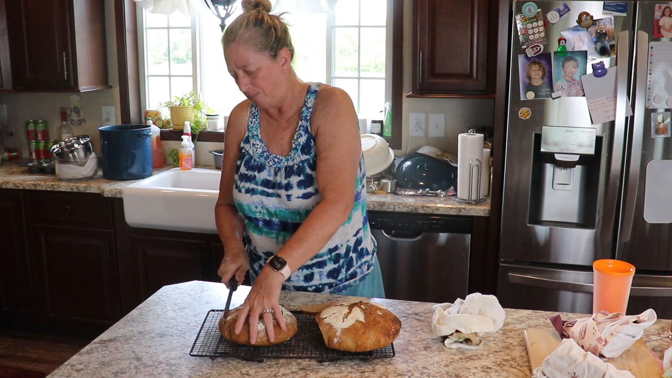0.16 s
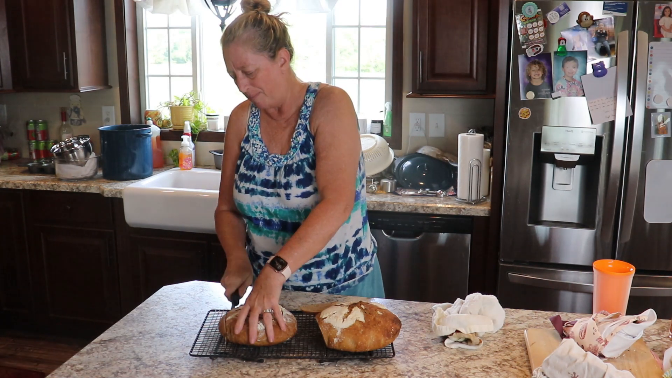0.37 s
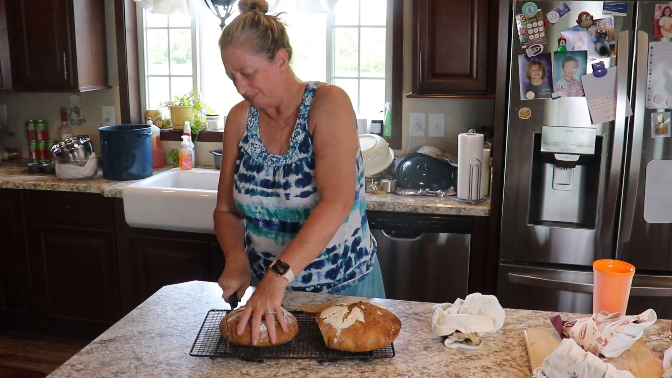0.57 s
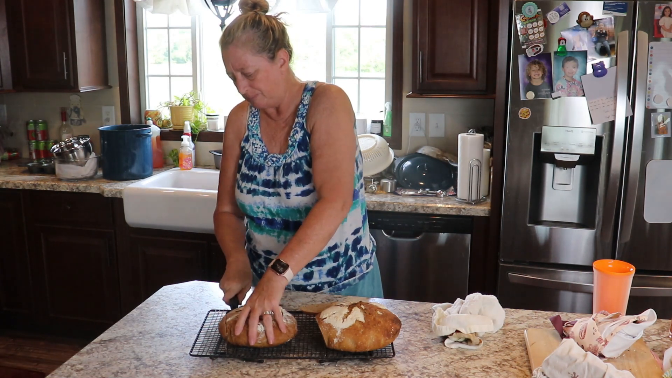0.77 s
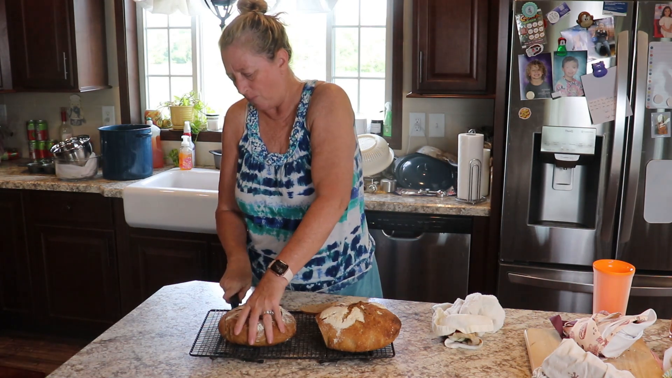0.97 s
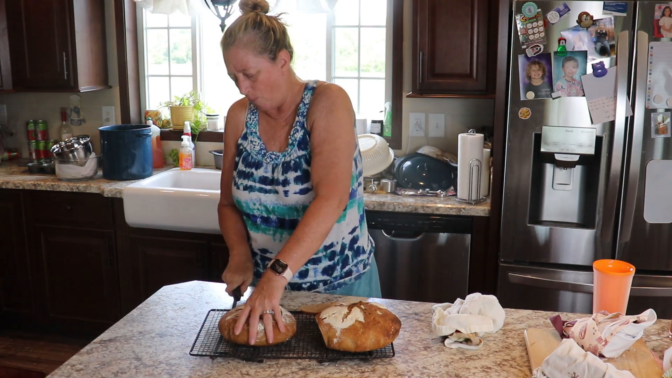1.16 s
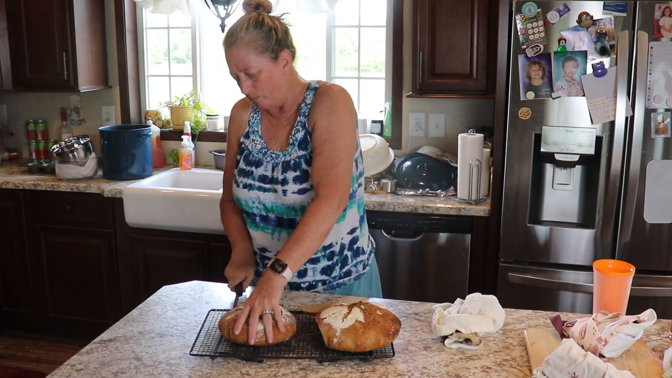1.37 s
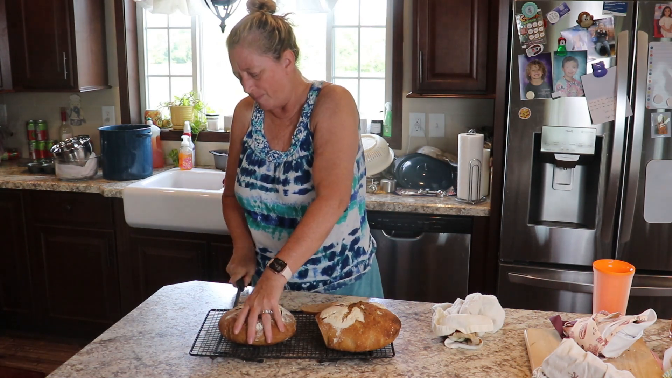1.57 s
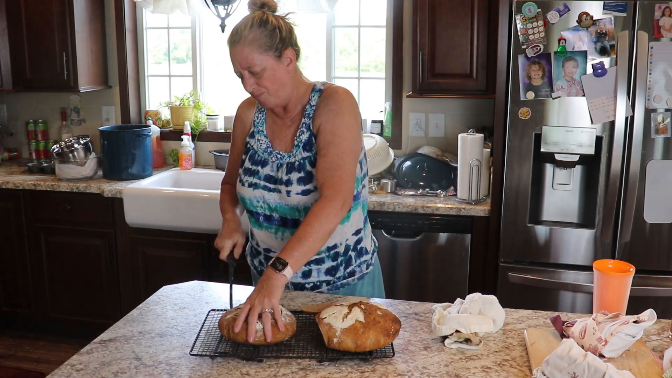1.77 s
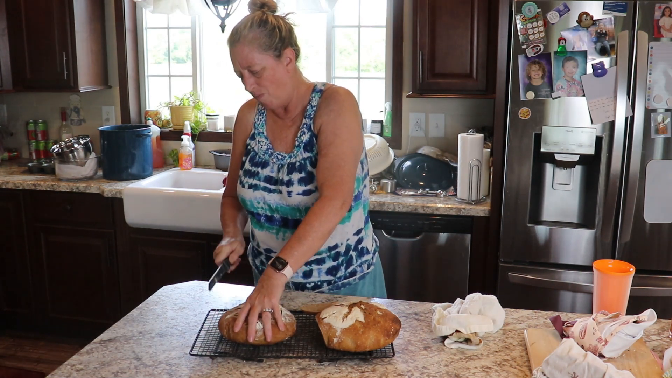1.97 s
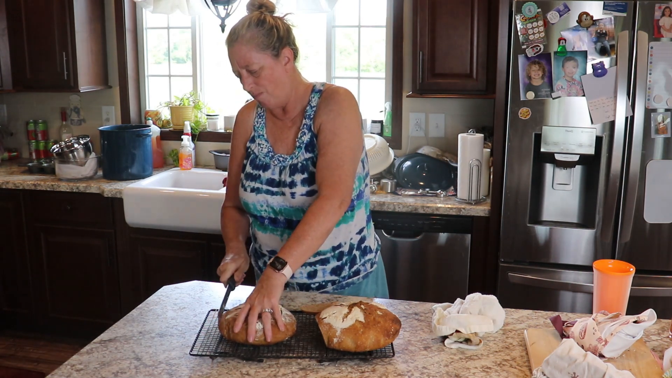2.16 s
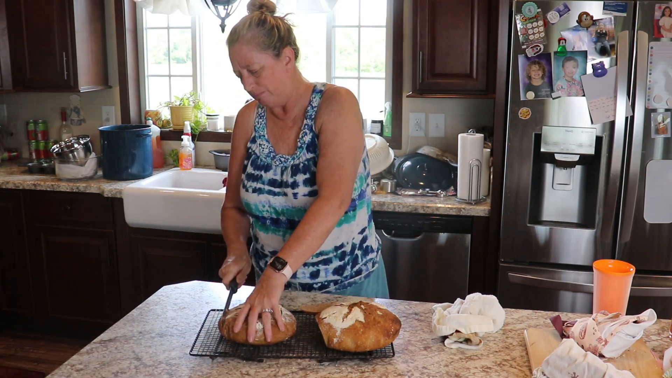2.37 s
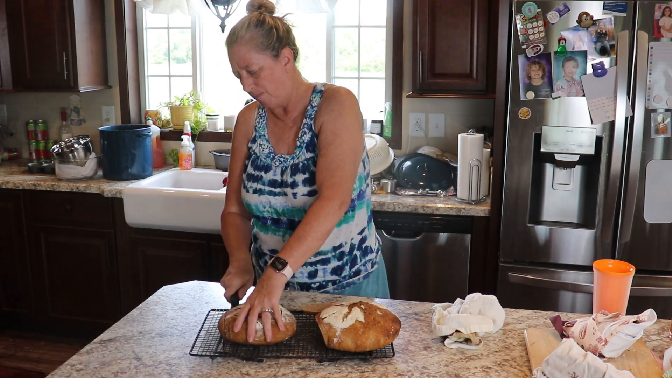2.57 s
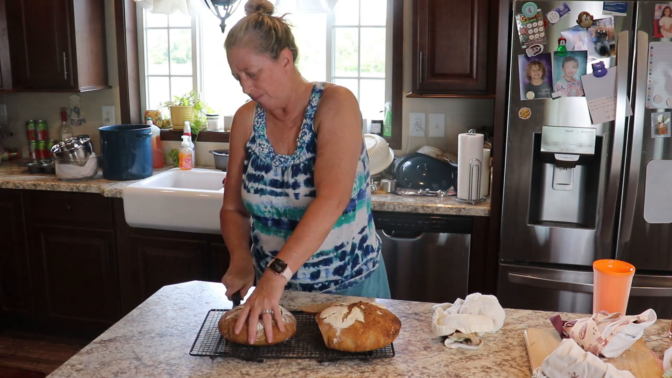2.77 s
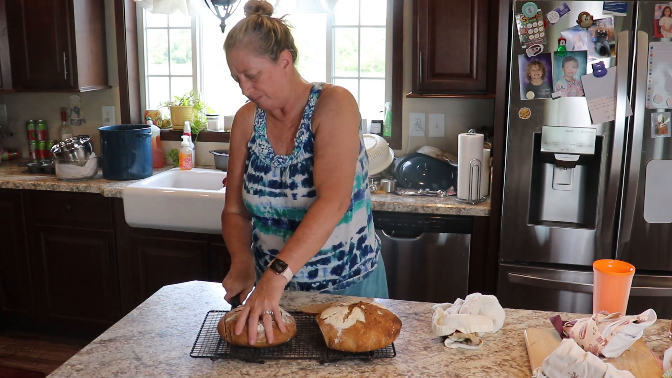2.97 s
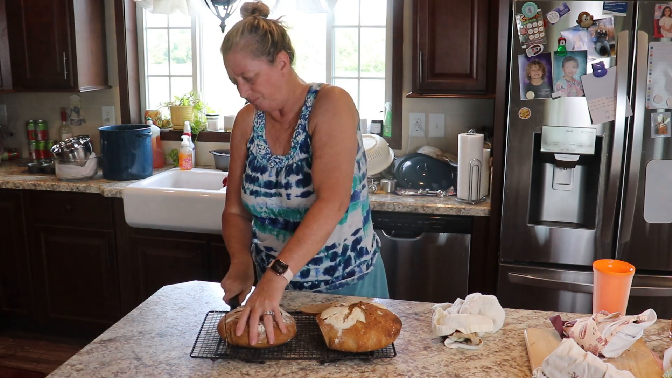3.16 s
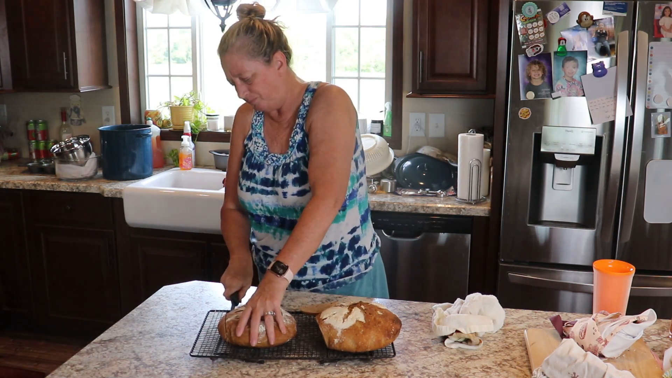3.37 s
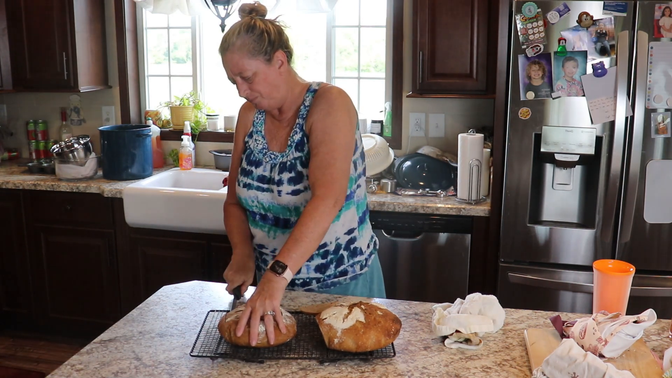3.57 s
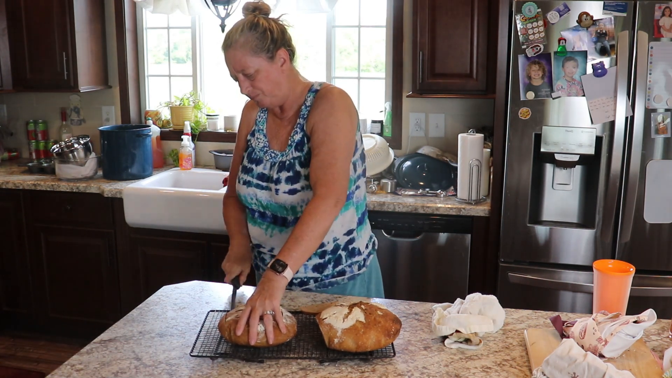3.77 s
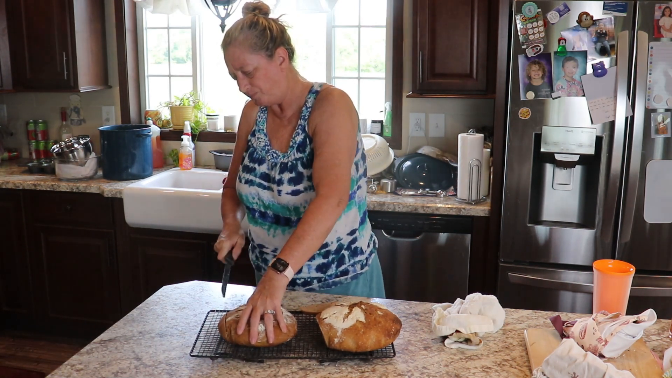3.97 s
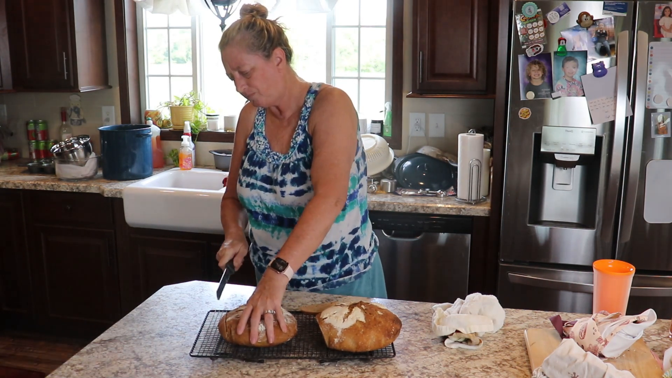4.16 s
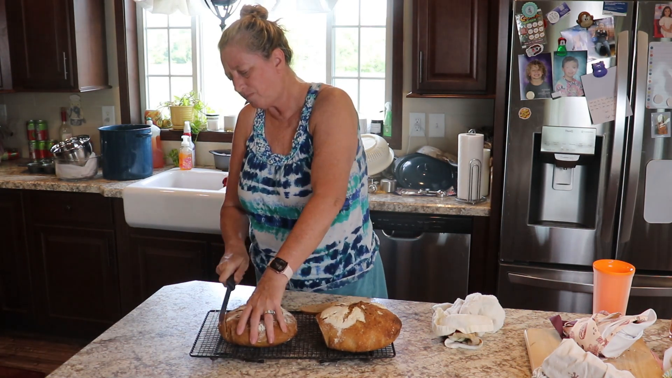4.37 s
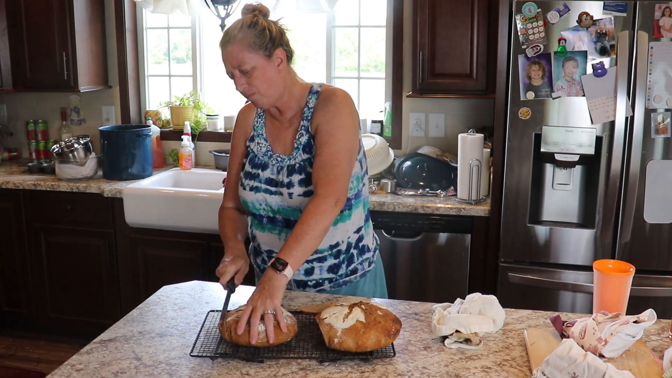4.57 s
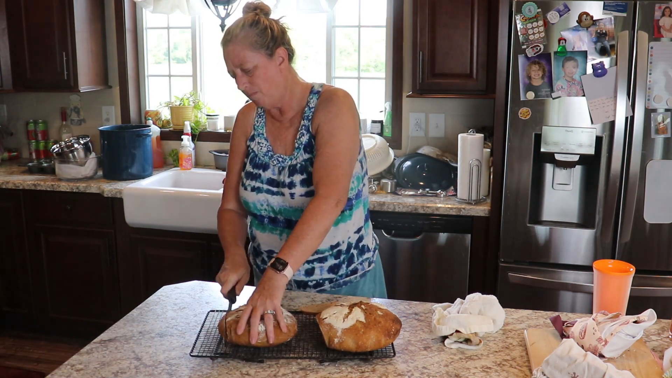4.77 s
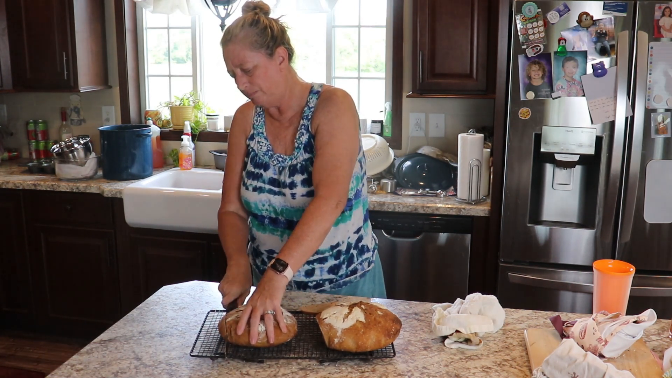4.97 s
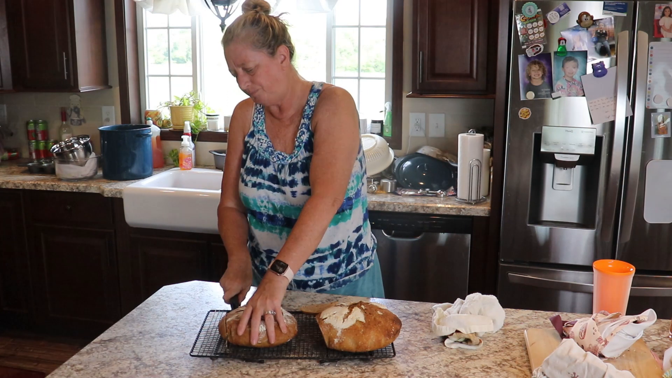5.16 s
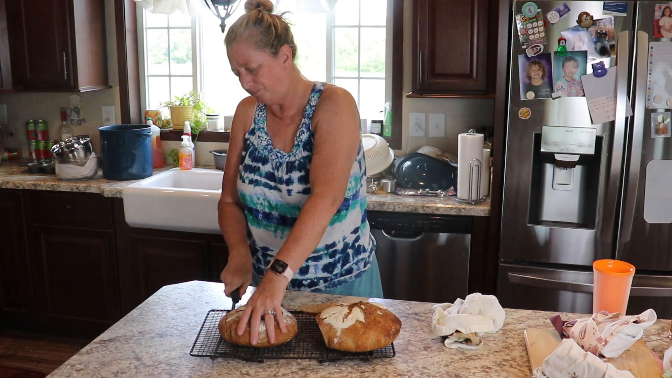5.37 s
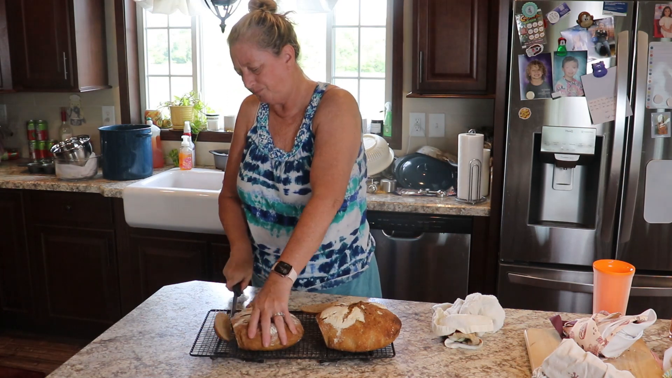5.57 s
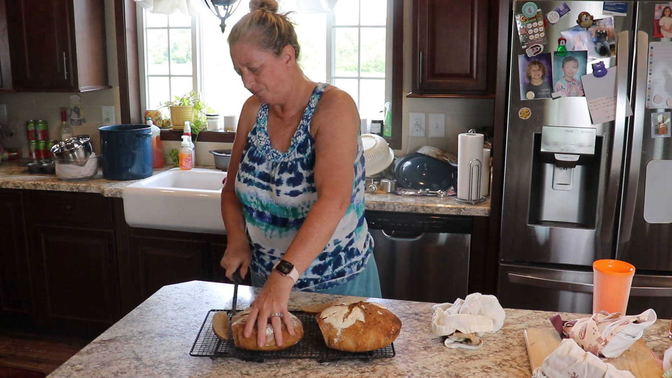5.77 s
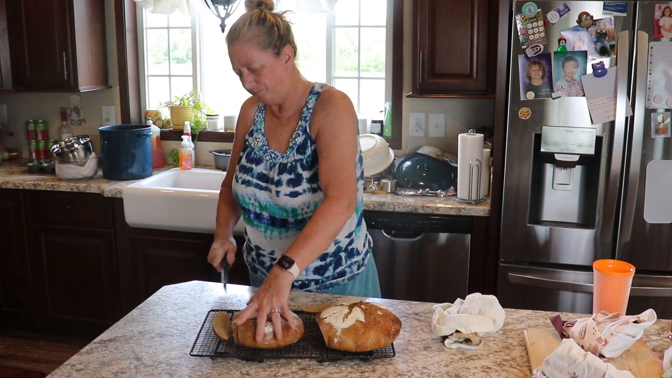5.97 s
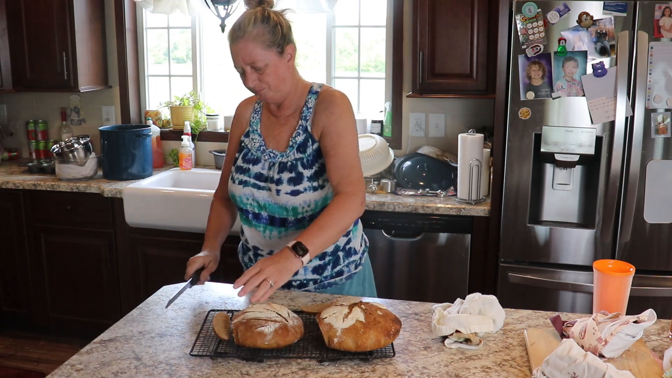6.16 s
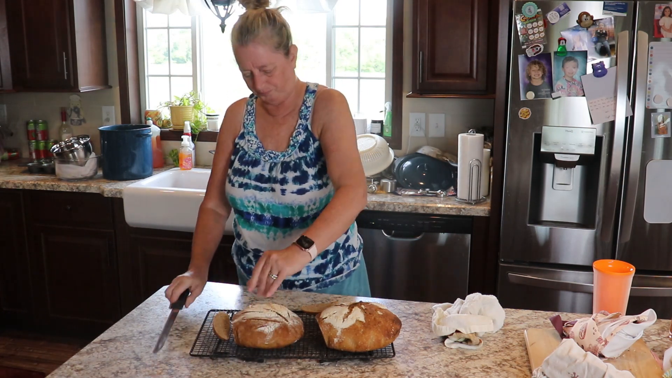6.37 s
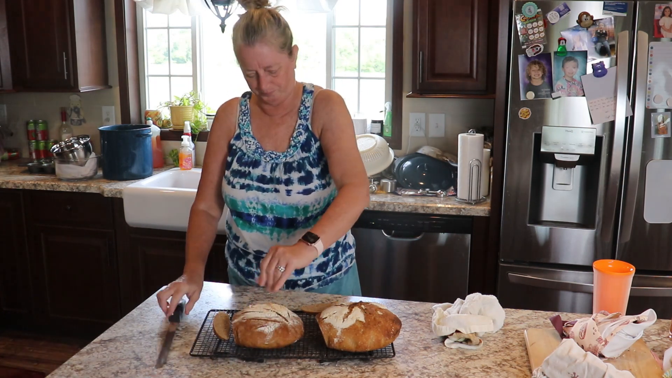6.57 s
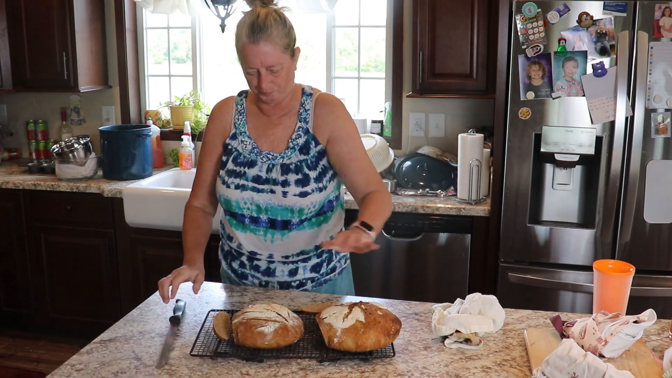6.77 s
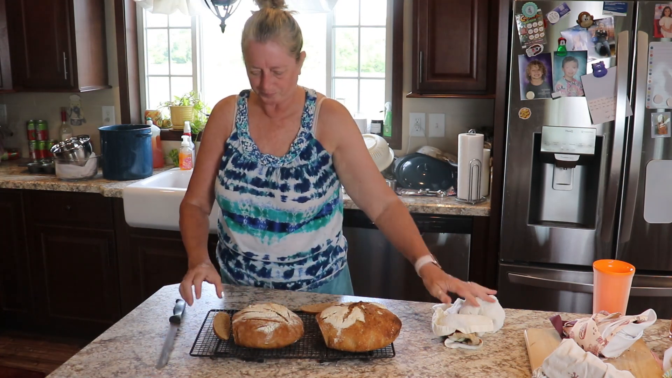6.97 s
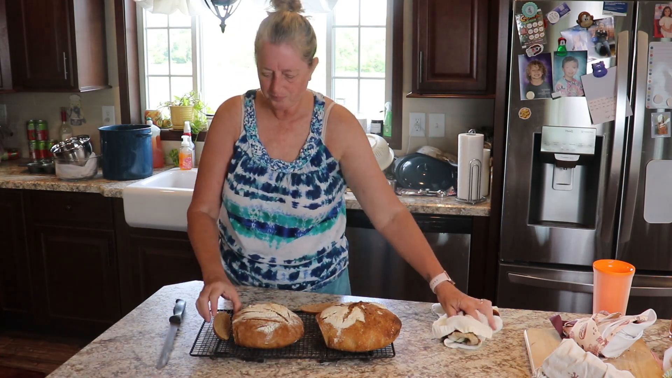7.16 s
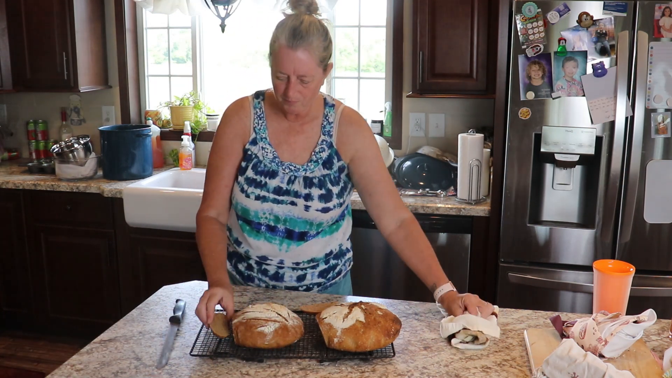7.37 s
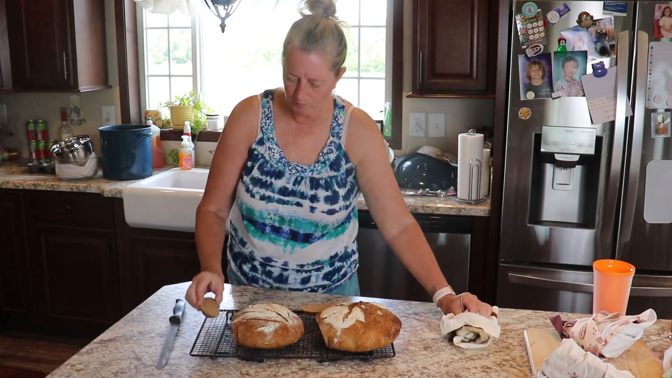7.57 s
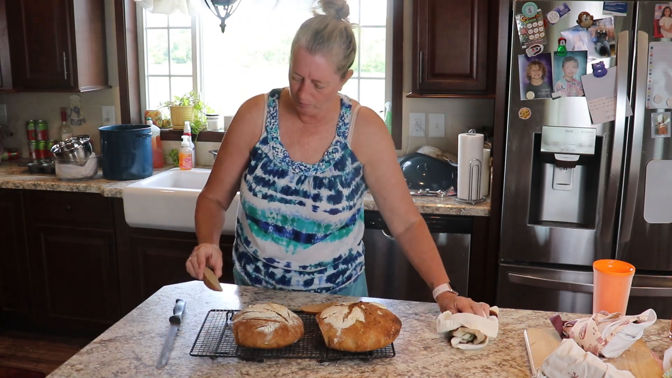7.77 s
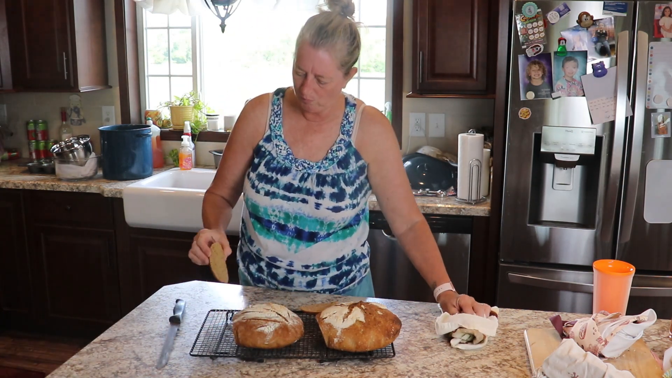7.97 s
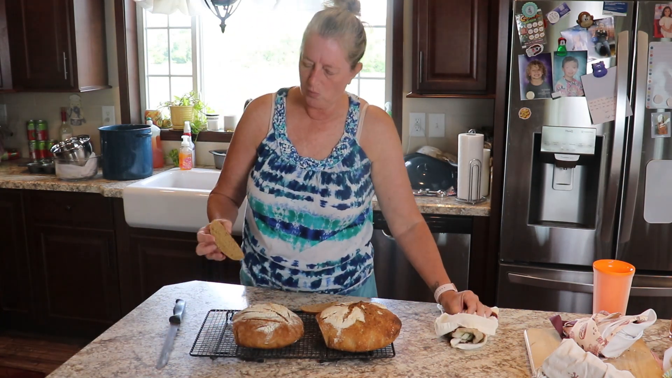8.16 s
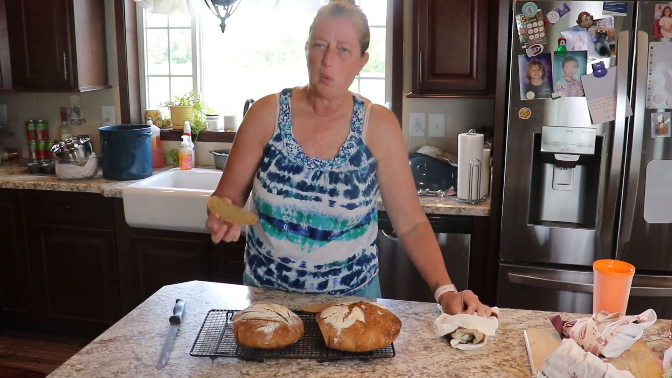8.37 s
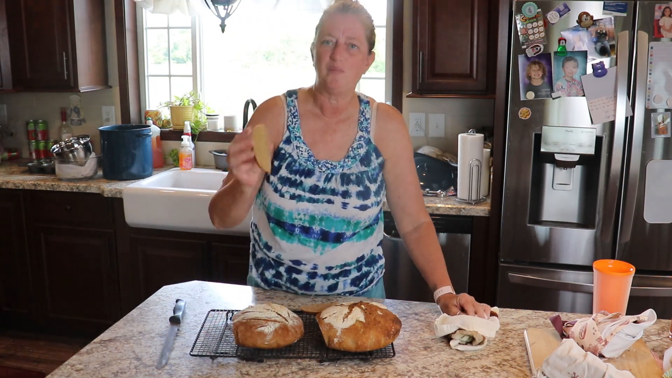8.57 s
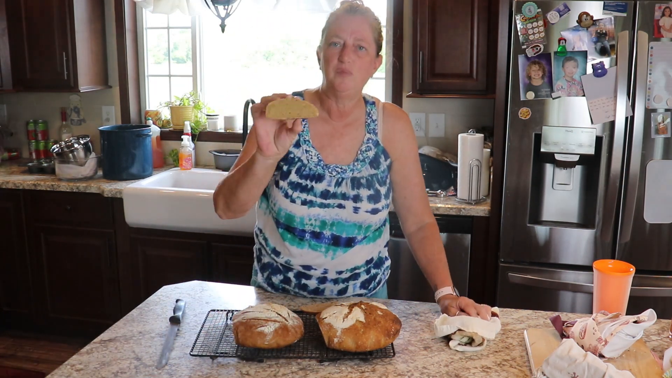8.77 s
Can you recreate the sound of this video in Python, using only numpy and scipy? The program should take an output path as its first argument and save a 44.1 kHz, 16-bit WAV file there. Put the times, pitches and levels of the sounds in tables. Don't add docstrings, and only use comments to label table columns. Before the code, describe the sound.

Crackling bread crust under short sawing strokes, a faint blade ring, then hard metallic knocks and a brief scrape as the knife is laid down.

```python
import sys
import numpy as np
from scipy import signal
from scipy.fft import rfft, irfft, next_fast_len
from scipy.io import wavfile
from scipy.ndimage import uniform_filter1d

SR = 44100
rng = np.random.default_rng(int(sys.argv[2]) if len(sys.argv) > 2 else 0)


def decibels_to_gain(level_db):
    exponent = np.asarray(level_db, float) / 20
    return 10 ** exponent


def generate_wav(signal):
    frames = np.transpose(np.atleast_2d(signal))
    scaled = np.clip(frames, -1, 1) * 32767
    pcm = np.round(scaled).astype(np.int16)
    wavfile.write(sys.argv[1], SR, pcm)


N = 389403

# frequency_hz, density_db (per Hz)
HISS_SPECTRUM = [(15, -41), (25, -11), (43, -1.5), (76, -5.5), (108, 1), (145, -12.5), (175, -8),
                 (416, -11.5), (560, -14), (886, -15.5), (1560, -18), (2160, -18.5), (5000, -21.5),
                 (16000, -32)]
# frequency_hz, coherence (0 to 1)
HISS_COHERENCE = [(60, 0.93), (180, 0.73), (550, 0.42), (1650, 0.17), (4970, 0.05), (15000, 0.13)]
# frequency_hz, t60_s
ROOM_DECAY = [(200, .5), (600, .6), (1400, .6), (3700, .48), (9700, .35)]
# frequency_hz, phase_rad
PORT_PHASE = [(0, -1), (690, 0.13), (1810, 0.62), (2670, 0.15), (3450, 1.0), (3790, 0.75), (5000, 1.5),
              (6630, 1.54), (7410, 1.5), (8700, 1.55), (12600, 3.5), (14400, 4.5), (15100, -1), (15700, 20)]
# frequency_hz, level_db
PORT_LEVEL = [(60, -1.5), (180, 0.0), (550, 0.0), (1650, -1.0), (4970, -1.5), (15000, 0.5)]
# start_s, peak_db, pitch_hz, t60_s
COUNTER_THUMPS = [
    (0.719, -33, 61.9, 0.3),
    (0.999, -34, 59.2, 0.3),
    (1.079, -36, 43.1, 0.3),
    (3.692, -32.5, 67.3, 0.3),
    (5.27, -23, 59.2, 0.3),
    (5.627, -28, 61.9, 0.3),
    (5.749, -38, 83.4, 0.3),
]
# start_s, peak_db, pitch_hz, treble_db, length_s
KNIFE_KNOCKS = [
    (6.574, 3.5, 3260, -11, 0.015),
    (6.582, -5, 3420, -19, 0.015),
    (6.654, 6, 2130, -24, 0.015),
    (6.671, -15, 1410, -17, 0.015),
    (6.691, -10, 576, -11, 0.015),
    (6.719, -3, 1950, -15, 0.015),
    (6.754, -10, 929, -13, 0.015),
    (6.935, -7.5, 764, -13, 0.015),
    (8.719, -21, 490, -12, 0.015),
]
# time_s, pressure_db, crispness_db
SLIDE_STROKE = [(6.575, -21, 7.5), (6.647, -27.5, -11.5), (6.655, -5, -20), (6.663, -20, -19),
                (6.713, -28.5, 9.5), (6.723, -15, -14), (6.771, -21, 3), (6.845, -22, -10),
                (6.929, -34, 1.5), (6.939, -27, 2.5), (7.137, -60, -15), (7.15, -35, -14)]
# frequency_hz, density_db (per Hz)
STONE_SPECTRUM = [(88, -77), (150, -43), (254, -5), (341, -16), (524, -1), (1020, -4.5), (1100, -5),
                  (4950, -15), (7600, -12.5), (16000, -16)]
# frequency_hz, width_hz, level_db
STEEL_MODES = [(1030, 50, -5.5), (1960, 29, -1), (3070, 220, -25), (3890, 41, -11), (5270, 47, 4.5),
               (6220, 110, -3), (7390, 44, -10), (8470, 79, -24), (9600, 75, -8), (10800, 71, 3.5)]
# time_s, level_db
BLADE_STROKES = [
    [(1.7, -62), (1.784, -61), (1.846, -41), (1.876, -59), (1.906, -52), (1.944, -66), (2.0, -59)],
    [(2.33, -62), (2.354, -73), (2.384, -54), (2.502, -69), (2.58, -53), (2.618, -53), (2.676, -47),
     (2.77, -68), (2.78, -54)],
    [(4.46, -72), (4.49, -52), (4.604, -50), (4.616, -42), (4.7, -46), (4.736, -29.5), (4.786, -55),
     (4.908, -59), (4.92, -57)],
]
# frequency_hz, width_hz, level_db
BLADE_MODES = [(2750, 94, -3), (4360, 33, -5), (4680, 55, -11), (5240, 70, -11), (5610, 20, -15),
               (7380, 110, -16), (8450, 52, -18)]
# start_s, peak_db, pitch_hz, treble_db, length_s
CRUST_SNAPS = [(0.549, -21.5, 1600, -24, 0.03), (0.656, -13.5, 3170, -24, 0.03),
               (0.683, -11.5, 1560, -23, 0.03), (0.879, 0, 2070, -23, 0.03), (0.897, 5, 1340, -21, 0.03),
               (1.045, -8, 2630, -15, 0.03), (1.051, 0.5, 1580, -26, 0.03), (1.074, -6, 703, -24, 0.03),
               (2.79, -23, 861, -28, 0.03), (2.827, -9, 1610, -21, 0.03), (3.321, -29, 1620, -25, 0.03),
               (3.459, -14.5, 840, -19, 0.03), (3.675, -8, 2340, -20, 0.03), (3.839, -2.5, 2260, -22, 0.03),
               (3.852, -1, 2130, -24, 0.03), (3.865, -5, 1520, -26, 0.03), (3.899, -6.5, 703, -25, 0.03),
               (4.956, 0.5, 2290, -13.5, 0.03), (5.15, -9, 867, -32, 0.03), (5.215, -2, 2300, -21, 0.03),
               (5.231, -2, 991, -29, 0.03), (5.309, -9.5, 775, -24, 0.03), (5.352, -12, 2280, -23, 0.03),
               (5.425, -9.5, 2230, -20, 0.03), (5.612, -0.5, 864, -19.5, 0.03), (5.639, -7, 840, -22, 0.03),
               (7.306, -32, 1240, -15, 0.03), (7.402, -22.5, 864, -22, 0.03),
               (8.304, -18.5, 3050, -2.5, 0.03), (8.324, -16.5, 3070, -15, 0.03)]
# time_s, pressure_db, crispness_db, boom_db
SAW_STROKES = [
    [(0.0, -70, 3, 11), (0.014, -32.5, -5.5, -14), (0.046, -33, -8, -11), (0.054, -36, -6, -8),
     (0.156, -49.5, -8, -18), (0.196, -46, -2, -1), (0.25, -52, -7, -1)],
    [(0.4, -50, 2, 2.5), (0.566, -27, -8.5, -8), (0.618, -39, -15, -5), (0.684, -27.5, -4, -3),
     (0.792, -37, -14, -6), (0.852, -32, 3.5, -4), (0.87, -36, -8, -1), (0.882, -11.5, 2, -9),
     (0.89, -16.5, -15, -1), (0.902, -12.5, 6.5, -13), (0.91, -23, -4, -4), (1.026, -25.5, -3, -10.5),
     (1.034, -37, 0, -2), (1.05, -10.5, 4, -12), (1.086, -19, -19, -8), (1.112, -20.5, -10, -14),
     (1.206, -32, -10, -1.5), (1.41, -44, -12, 1.5), (1.624, -34, -0.5, -6), (1.8, -51.5, -11, -3)],
    [(2.45, -55, -5, -9), (2.48, -66, -9, 1), (2.564, -44, -7, -5), (2.714, -45, -6, -11),
     (2.764, -52, -21, 13), (2.8, -31.5, -2, -12), (2.83, -18.5, -8, -11.5), (2.95, -39, -6, -0.5),
     (3.016, -33, -0.5, -8.5), (3.306, -59, -14, 5), (3.326, -33, -22, -1.5), (3.412, -45, -1, -5),
     (3.482, -21.5, -10, -4.5), (3.658, -31, -4.5, -3), (3.682, -21, -8, -7.5), (3.712, -21.5, -8.5, -3.5),
     (3.808, -23, 2, -12), (3.828, -21.5, -3, -4), (3.842, -11.5, -15, -10.5), (3.868, -8.5, 0.5, -11),
     (3.888, -20.5, -14, -3.5), (4.074, -48, -17, -14), (4.158, -49, -27, 2), (4.228, -61, -6, 2),
     (4.25, -53, -14, -4)],
    [(4.45, -65, -10, 8), (4.5, -40.5, -10, -6), (4.538, -51, 3, -5), (4.552, -44, -2, -18),
     (4.634, -52, -4, 6), (4.652, -43, -9, -22), (4.726, -36, -4, -15), (4.922, -63, -1, -4),
     (4.93, -48, -2, -8)],
    [(4.96, -18.5, 20, -17), (4.97, -24, 3.5, -4.5), (5.09, -45, -4, -15), (5.138, -39, 4, -6),
     (5.152, -19.5, -21, -12), (5.184, -23, -14, -17), (5.2, -31.5, -7, -3), (5.218, -9.5, -1, -10),
     (5.252, -16.5, -19, -6), (5.398, -31.5, -3, -7), (5.522, -26, -9, -8.5), (5.57, -34, 3.5, -9),
     (5.618, -14, -5, -14), (5.654, -17, -6.5, -16), (5.716, -14, 1, -11.5), (5.902, -33, -9, -6.5),
     (6.196, -54, -5, 0), (6.2, -61, 1, 11)],
    [(7.25, -65, -5, 7), (7.296, -65, -6, -4), (7.308, -37.5, -20, -11), (7.366, -52, -10, -8),
     (7.374, -61, -4, 14), (7.404, -32.5, -13, 1), (7.458, -43.5, -26, 1), (7.692, -62, -14, -3),
     (7.7, -59, -6, 1)],
]
# frequency_hz, density_db (per Hz)
CRUST_SPECTRUM = [(59, -38), (100, -11.5), (244, -0.5), (415, -8.5), (661, -1), (1420, -5), (2270, -6),
                  (2680, -12), (3930, -11.5), (4760, -14.5), (10700, -20.5), (16000, -37)]
# frequency_hz, width_hz, level_db
LOAF_MODES = [(270, 70, -7), (545, 50, -2), (680, 60, -4.5), (850, 60, -4.5), (1330, 90, -7),
              (1570, 90, -7.5), (2230, 140, -13), (3880, 200, -13.5)]


def evened(x):
    return x / np.sqrt(np.mean(x ** 2) + 1e-20)


def read(points, hz):
    f, value = np.transpose(points)
    return np.interp(np.log(hz + 1), np.log(f + 1), value)


def add(mix, start_s, sound):
    part = mix[round(start_s * SR):][:len(sound)]
    part += sound[:len(part)]


def stroke_curves(tables):
    t = np.arange(N) / SR
    time_s, *values = np.vstack(tables).T
    gate = sum((t >= rows[0][0]) & (t <= rows[-1][0]) for rows in tables)
    curves = [np.interp(t, time_s, v) for v in values]
    return uniform_filter1d(gate * 1., 300), curves


def band(x, lo_hz, hi_hz):
    edges_hz = [lo_hz, min(hi_hz, SR / 2.2)]
    sos = signal.butter(3, edges_hz, "band", fs=SR, output="sos")
    return evened(signal.sosfilt(sos, x))


def modal_sum(x, modes):
    total = 0
    for hz, width_hz, level_db in modes:
        b, a = signal.iirpeak(hz, hz / max(width_hz, 5), SR)
        total = total + decibels_to_gain(level_db) * signal.lfilter(b, a, x)
    return total


def body(x, spectrum, modes, ring):
    hz = abs(np.fft.fftfreq(4096, 1 / SR))
    log_gain = np.log(decibels_to_gain(np.maximum(read(spectrum, hz), -90)))
    taps = np.fft.ifft(np.exp(np.conj(signal.hilbert(log_gain)))).real[:2048]
    x = signal.oaconvolve(x, taps)[:N]
    return x + ring * modal_sum(x, modes)


def crackle(per_s, spread_db, clump_db):
    size = decibels_to_gain(spread_db * np.minimum(rng.exponential(1, N), 5)) * rng.standard_normal(N)
    clumps = evened(uniform_filter1d(uniform_filter1d(rng.standard_normal(N), 260), 260))
    return size * (rng.random(N) < per_s / SR) * decibels_to_gain(clump_db * clumps)


def impacts(events, ring):
    out, t = np.zeros(N), np.arange(5000) / SR
    noise = rng.standard_normal((len(events), len(t)))
    for (start_s, peak_db, hz, treble_db, length_s), burst in zip(events, noise):
        treble = decibels_to_gain(treble_db + 10.5) * band(burst, 4500, 15000)
        crack = band(burst, 350, 4500) + treble
        knock = np.sin(2 * np.pi * hz * t) * 1.4
        decay = decibels_to_gain(-60 * t / np.clip(length_s, .004, .12))
        attack = 1 - np.exp(-t / .0006)
        sound = decay * attack * ((1 - ring) * crack + ring * knock)
        add(out, start_s, decibels_to_gain(peak_db - 0.5) * sound)
    return out


def with_coherence(first, other, same):
    return same * first + np.sqrt(1 - same ** 2) * other


def room_hiss():
    frames, hz = N // 256 + 5, np.fft.rfftfreq(1024, 1 / SR)
    a, b, c, d, patches = rng.standard_normal((frames, 513, 5)).T
    patches = evened(uniform_filter1d(uniform_filter1d(patches, 10, 0), 14, 1))
    same = np.clip(read(HISS_COHERENCE, hz), -1, 1)[:, None]
    left = a + 1j * b
    z = np.array([left, with_coherence(left, c + 1j * d, same)])
    z *= decibels_to_gain(read(HISS_SPECTRUM, hz)[:, None] + .8 * patches)
    noise = signal.istft(z, nperseg=1024, noverlap=768)[1][:, :N]
    return decibels_to_gain(-39) * evened(noise)


def kitchen(x):
    taps = np.zeros((2, SR))
    at = np.arange(200, SR - 20, 20) + rng.integers(0, 20, (2, (SR - 201) // 20))
    np.put_along_axis(taps, at, rng.choice([-1., 1.], at.shape), 1)
    hz, t, z = signal.stft(taps, SR, nperseg=256)
    same = np.clip(1 / (1 + (hz / 700) ** 2), 0, 1)[:, None]
    z[1] = with_coherence(z[0], z[1], same)
    decay = decibels_to_gain(-60 * t / read(ROOM_DECAY, hz)[:, None])
    tail = signal.istft(z * decay, SR, nperseg=256)[1]
    return signal.fftconvolve(x[None], tail / np.linalg.norm(tail[0]), axes=1)[:, :N]


def microphone_ports(x):
    size = next_fast_len(N)
    hz = np.fft.rfftfreq(size, 1 / SR)
    half = np.exp(.5j * read(PORT_PHASE, hz)) * decibels_to_gain(read(PORT_LEVEL, hz) / 2)
    return irfft(rfft(x, size) * np.array([half, 1 / half]), size)[:, :N]


def counter_thumps():
    out, t = np.zeros(N), np.arange(SR // 2) / SR
    for start_s, peak_db, hz, t60_s in COUNTER_THUMPS:
        envelope = decibels_to_gain(peak_db + 8.0 - 60 * t / t60_s) * (1 - np.exp(-t / .025))
        add(out, start_s, envelope * np.sin(2 * np.pi * hz * t))
    return out


def knife_knocks():
    return impacts(KNIFE_KNOCKS, ring=.6)


def knife_slide():
    gate, (pressure_db, crispness_db) = stroke_curves([SLIDE_STROKE])
    x = body(crackle(per_s=9000, spread_db=3.0, clump_db=2.5), STONE_SPECTRUM, STEEL_MODES, ring=2.5)
    crisp = decibels_to_gain(crispness_db + 4.7) * band(x, 2500, 16000)
    return gate * decibels_to_gain(pressure_db - 1.0) * (band(x, 250, 2500) + crisp)


def blade_singing():
    gate, (level_db,) = stroke_curves(BLADE_STROKES)
    ticks = crackle(per_s=400, spread_db=3.0, clump_db=0.0)
    return gate * decibels_to_gain(level_db + 0.3) * evened(modal_sum(ticks, BLADE_MODES))


def crust_snaps():
    return impacts(CRUST_SNAPS, ring=.3)


def sawing():
    gate, (pressure_db, crispness_db, boom_db) = stroke_curves(SAW_STROKES)
    x = body(crackle(per_s=5000, spread_db=3.0, clump_db=2.5), CRUST_SPECTRUM, LOAF_MODES, ring=1.2)
    crisp = decibels_to_gain(crispness_db + 0.14) * band(x, 2500, 16000)
    boom = decibels_to_gain(boom_db + 2.16) * band(x, 110, 400)
    return gate * decibels_to_gain(pressure_db - 2.0) * (band(x, 400, 2500) + crisp + boom)


def scene():
    near = sawing() + crust_snaps() + blade_singing() + knife_slide() + knife_knocks()
    heard = microphone_ports(near) + decibels_to_gain(-3.5) * kitchen(near)
    return heard + counter_thumps() + room_hiss()


def band_limit(x):
    return signal.sosfilt(signal.butter(12, 16120, fs=SR, output="sos"), x)


def record(dry):
    power_db = 10 * np.log10(abs(uniform_filter1d((dry ** 2).mean(0), 400)) + 1e-12)
    fall_db = np.arange(N) * 12. / SR
    held_db = np.maximum.accumulate(power_db + fall_db) - fall_db
    over_db = np.maximum(held_db + 18.5, 0)
    ducked = dry / decibels_to_gain(.15 * uniform_filter1d(over_db, 200))
    return band_limit(np.clip(ducked, -1, 1))


dry = scene()
out = record(dry)
generate_wav(out)
```